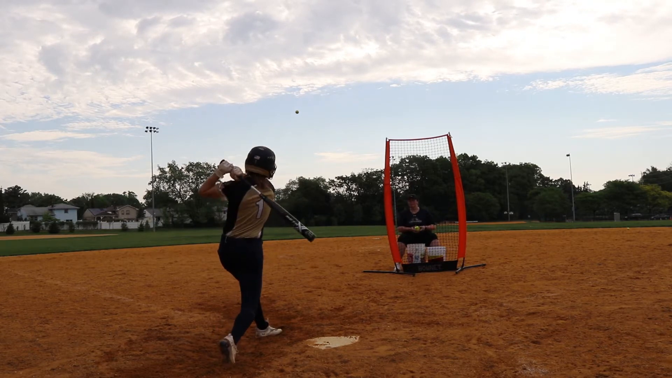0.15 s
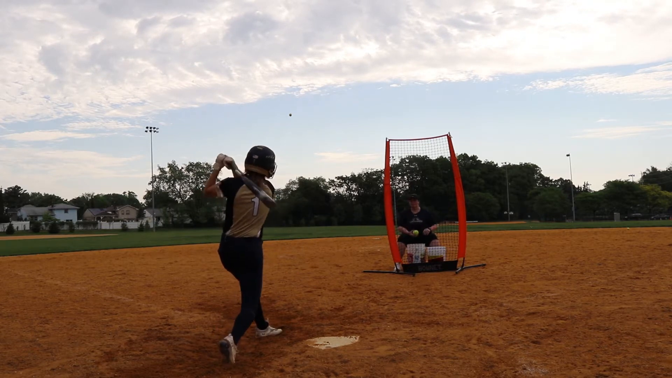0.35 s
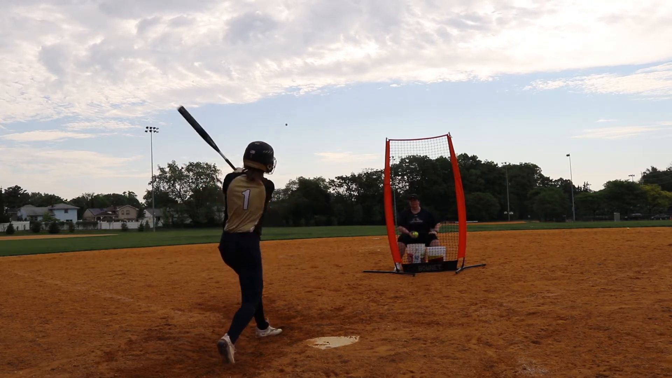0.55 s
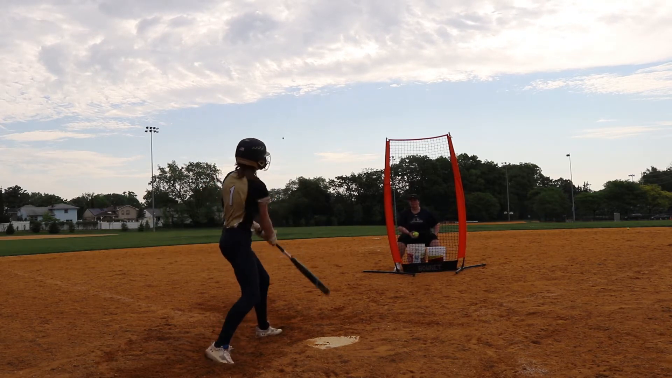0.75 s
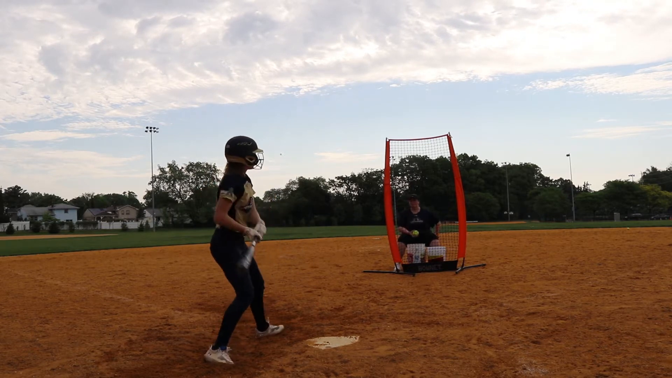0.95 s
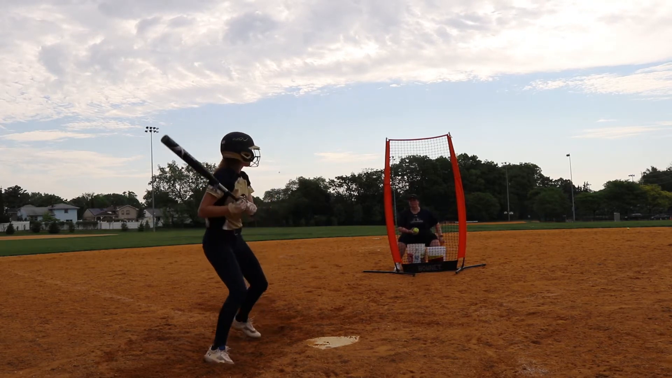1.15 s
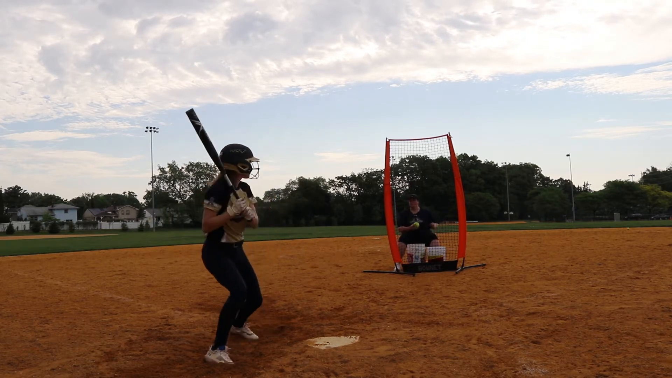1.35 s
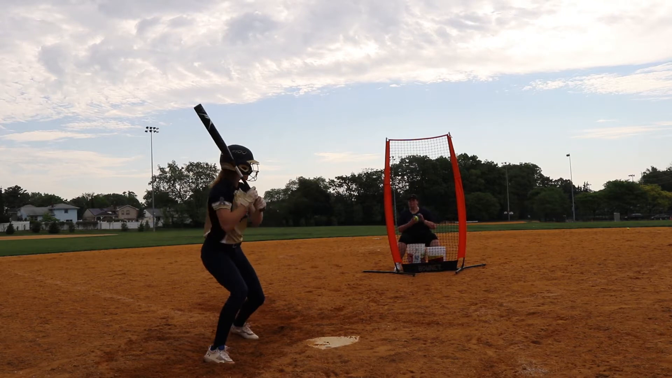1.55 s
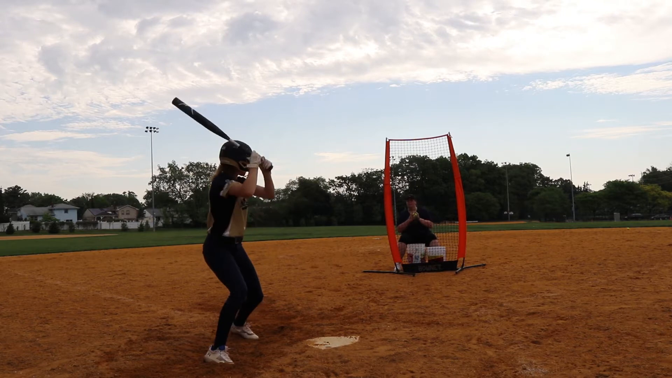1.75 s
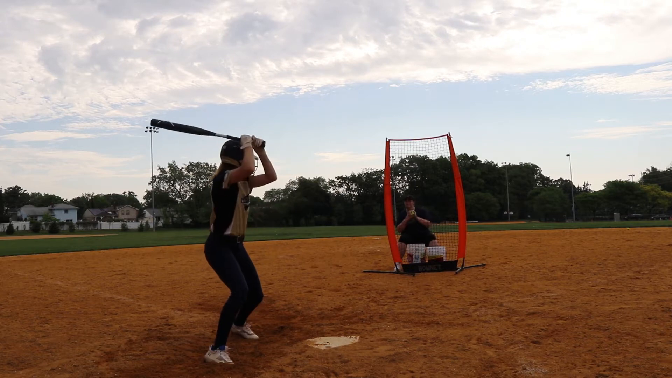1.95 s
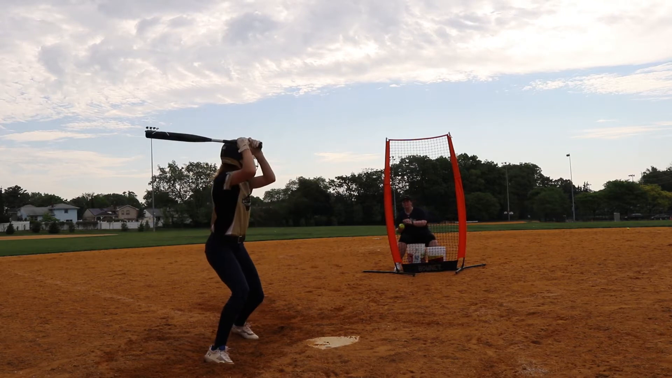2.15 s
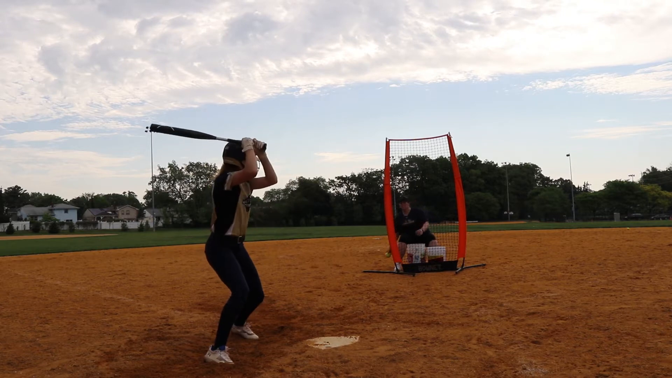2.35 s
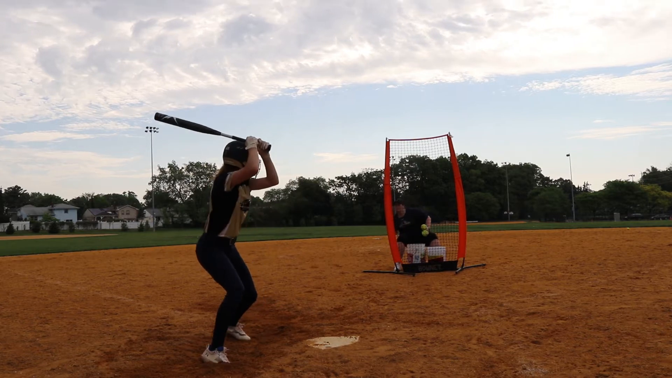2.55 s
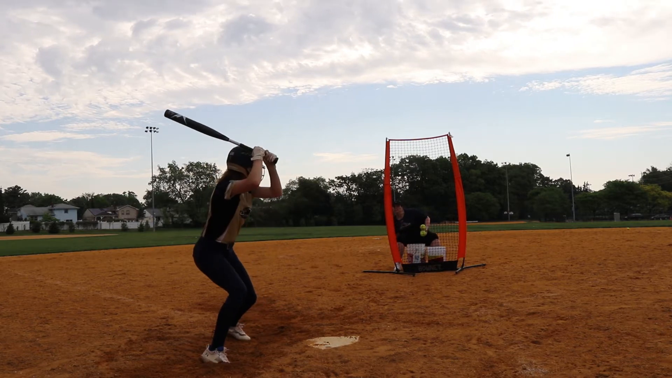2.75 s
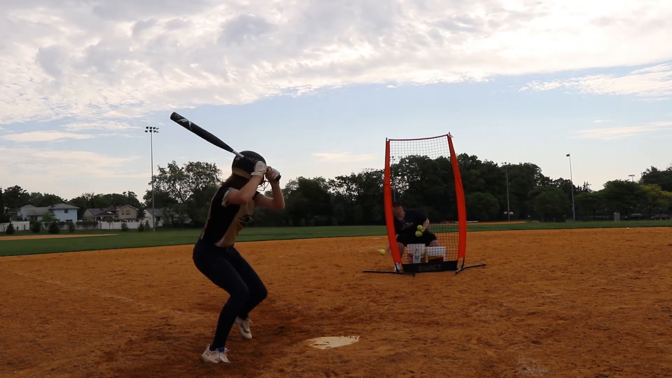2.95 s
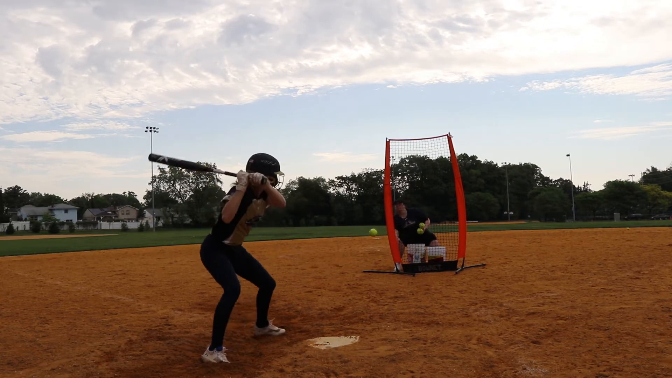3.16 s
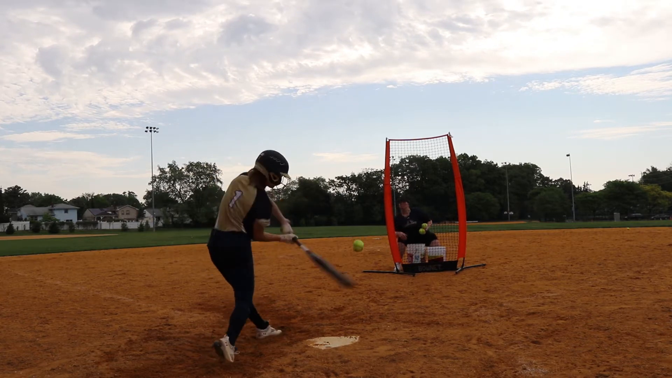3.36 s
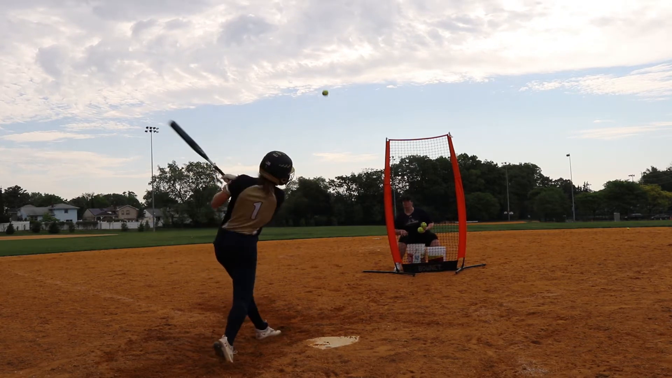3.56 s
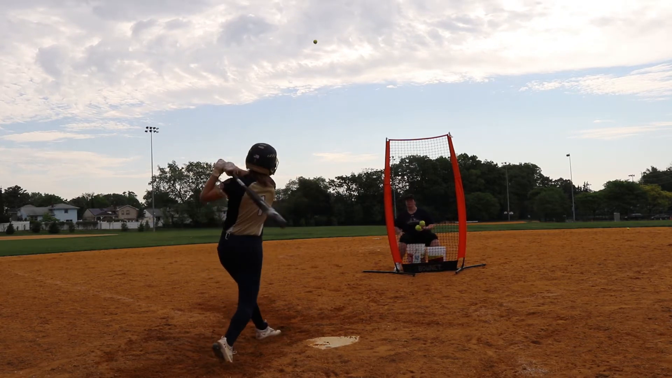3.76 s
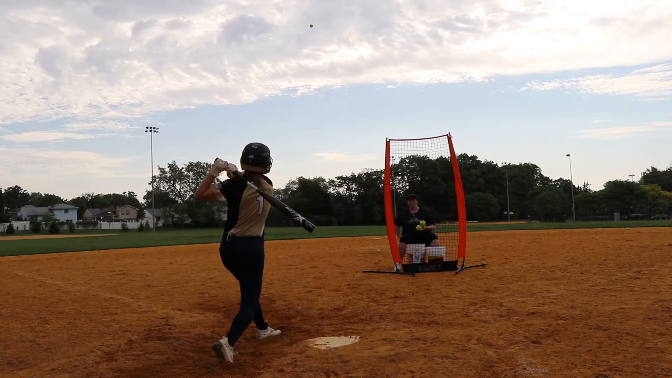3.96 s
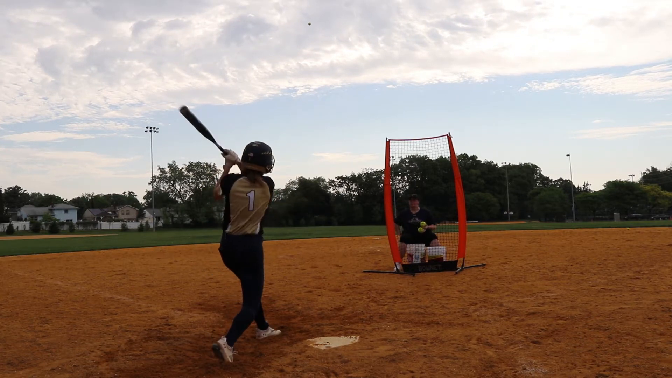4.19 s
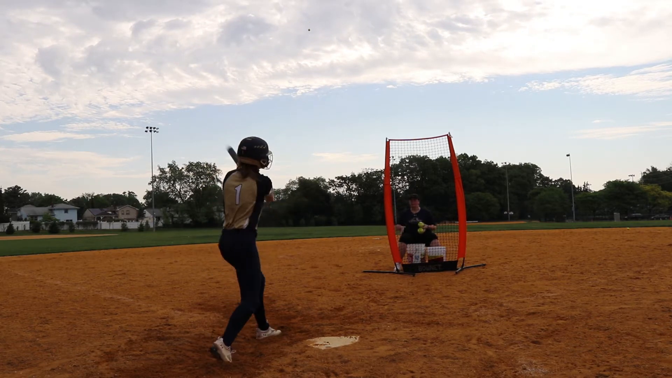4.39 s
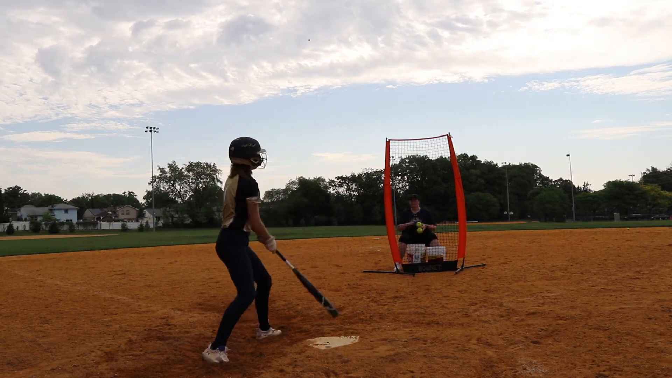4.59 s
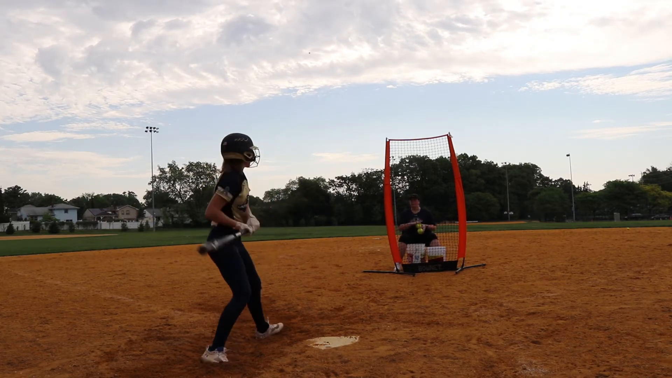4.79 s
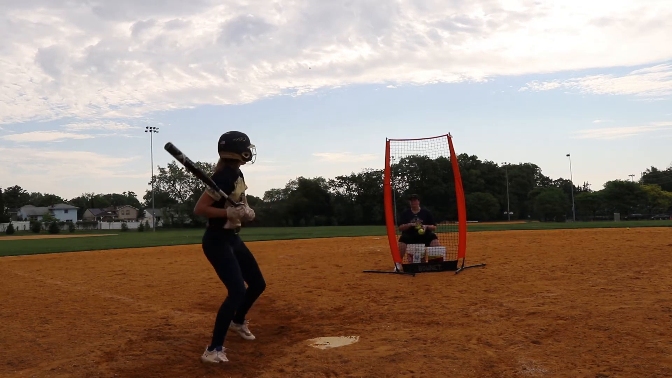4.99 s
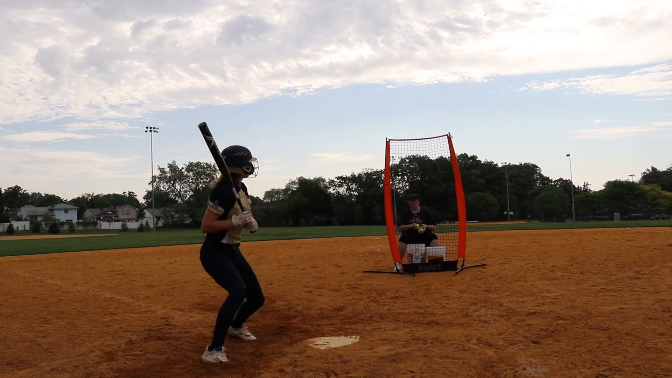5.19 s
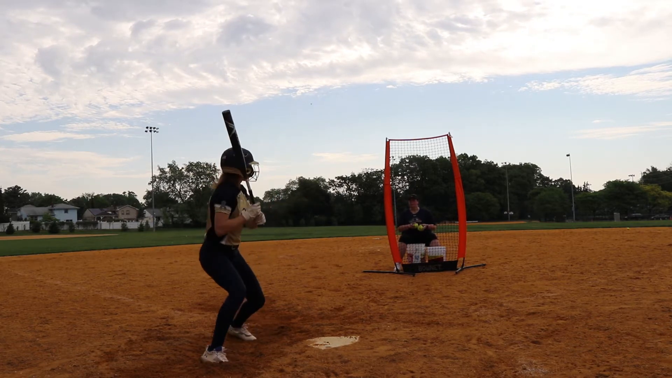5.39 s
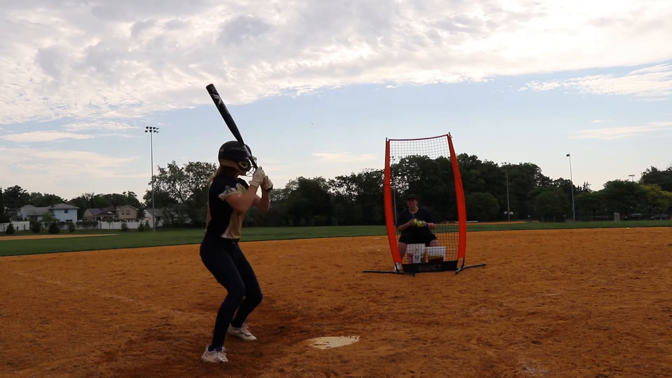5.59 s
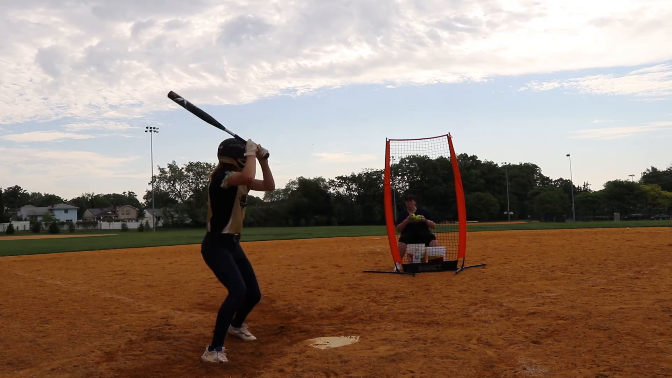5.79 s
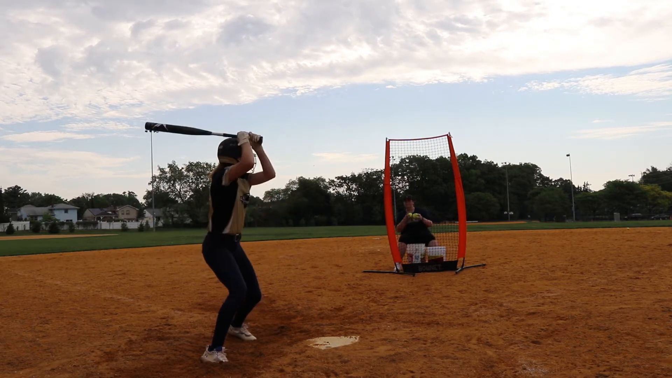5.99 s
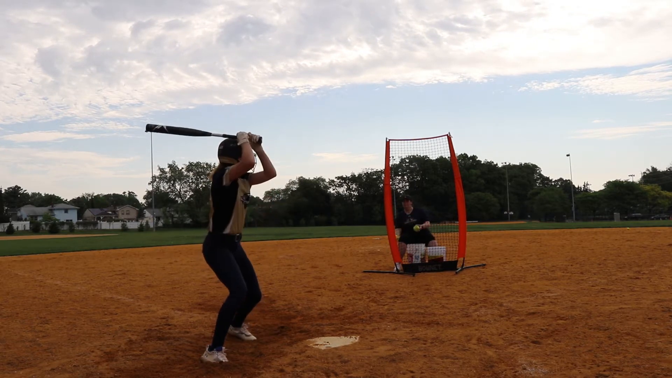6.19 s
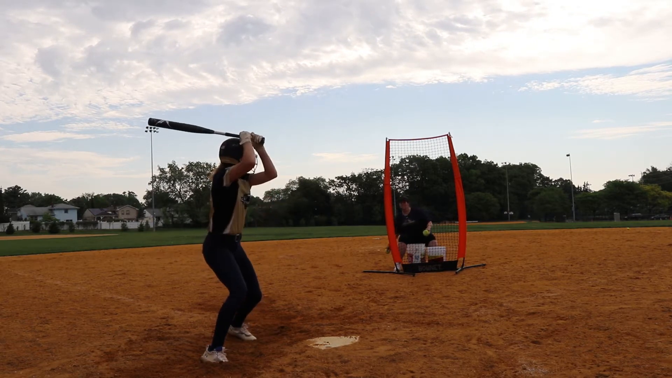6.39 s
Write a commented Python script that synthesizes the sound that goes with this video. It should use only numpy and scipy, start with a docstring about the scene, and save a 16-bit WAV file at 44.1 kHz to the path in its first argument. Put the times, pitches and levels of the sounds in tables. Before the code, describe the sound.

On an open dirt infield, a batter's shoes thud, click and scrape softly while small birds trill and whistle in far trees over faint rumble. Midway, a very short swish leads to one hard, bright bat crack that overloads the microphone and briefly ducks the background. Short echoes fade over the field, sparse scuffs and bird calls follow, and low breeze buffets the microphone near the end.

```python
"""A bat hits a tossed softball with one sharp crack: a push of air, ringing tones and scattered noise.
Around it the batter shuffles, strides and swings on a dirt infield: damped thuds, clicks and shaped noise.
Birds sing in the far trees as gliding tones, blurred by echoes, over a low outdoor rumble of noise.
A breeze, made of low lumpy noise, reaches the microphone near the end.
The crack overloads the microphone, whose gain control ducks and recovers."""
import sys
import numpy as np
from scipy import signal
from scipy.fft import rfft, irfft, next_fast_len
from scipy.io import wavfile
from scipy.ndimage import uniform_filter1d, map_coordinates

SR = 44100
rng = np.random.default_rng(int(sys.argv[2]) if len(sys.argv) > 2 else 0)


def persist_wave(psi):
    """Save psi, clipped to +-1, as 16-bit WAV."""
    counts = np.round(np.clip(psi, -1, 1) * 32767).astype(np.int16)
    wavfile.write(sys.argv[1], SR, np.atleast_2d(counts).T)


N = 283827  # length of the scene in samples
HIT_S = 3.4955  # the bat meets the ball

# soles twisting in the grit; hiss and weight are relative to the level:
# centre_s, half_length_s, level_db, hiss_db, weight_db
SOLE_TWISTS = [(0.11, 0.16, -71.5, -7, -13), (0.303, 0.035, -67, -29, 3.5), (0.543, 0.068, -67, -30, -13),
               (0.819, 0.041, -67.5, -10, 11.5), (0.93, 0.1, -73, -25, 3.5), (1.164, 0.0058, -71, 4.5, -20),
               (1.37, 0.02, -69.5, 2, 0), (2.244, 0.053, -64, -32, -2), (2.415, 0.028, -73, -18, 3.5),
               (3.291, 0.0097, -59, -2.5, -11), (3.323, 0.027, -56.5, -16.5, 1),
               (3.443, 0.043, -64, -4.5, -20.5), (3.678, 0.073, -61.5, -25, -24),
               (4.256, 0.028, -70, -9, -15), (4.59, 0.015, -70.5, -6, -10), (4.6, 0.087, -67, -20, -19),
               (4.733, 0.0038, -59.5, -4.5, 4), (4.797, 0.051, -63, -11.5, -18),
               (5.142, .013, -67.5, -10, 3), (5.19, 0.05, -72.5, 2, -1), (6.137, 0.02, -62.5, -18, -11),
               (6.37, 0.042, -72, -9, -1)]
# tone colour of loose dirt: frequency_hz, level_db
DIRT_COLOUR = [(150, -8.5), (500, 2.5), (1300, -0.5), (2400, -8), (4000, -18), (9000, -33), (15000, -40)]


def amp(db):
    """Turn decibels into a gain."""
    return 10 ** (np.asarray(db) / 20)


def unit(x):
    """Scale a sound to an average (rms) level of 1."""
    return x / np.sqrt(np.mean(x ** 2) + 1e-20)


def clock():
    """The time of every sample in seconds."""
    return np.arange(N) / SR


def curves(rows):
    """Join the points of each column after the time with straight lines, one value per sample."""
    times_s, *columns = np.transpose(rows)
    return [np.interp(clock(), times_s, column) for column in columns]


def wobble(rate, size=N):
    """A smooth random curve with the given number of random points a second."""
    points = rng.standard_normal(int(size * rate / SR) + 4)
    return map_coordinates(points, [np.arange(size) * rate / SR])


def bump(centre_s, half_s):
    """A smooth bell-shaped swell that reaches 1 at its centre."""
    return np.exp(-.5 * ((clock() - centre_s) / half_s) ** 2)


def noise(colour, size=N):
    """Steady noise of rms 1, louder or softer at each frequency as the colour table says."""
    colour_hz, colour_db = np.transpose(colour)
    fft_size = next_fast_len(size)
    hz = np.fft.rfftfreq(fft_size, 1 / SR)
    gain = amp(np.interp(np.log(hz + 1), np.log(colour_hz), colour_db))
    white = rng.standard_normal(fft_size)
    return unit(irfft(rfft(white) * gain, fft_size)[:size])


def patchy(colour, depth_db):
    """Noise whose colour shifts at random from moment to moment."""
    spectrogram = signal.stft(noise(colour, N + SR // 10), nperseg=512)[2]
    patches = rng.standard_normal(spectrogram.shape)
    patches = uniform_filter1d(patches, size=3, axis=0)  # blur over frequency
    patches = uniform_filter1d(patches, size=6, axis=1)  # blur over time
    shifted = signal.istft(spectrogram * amp(depth_db * unit(patches)), nperseg=512)[1]
    return unit(shifted[512:][:N])


def add(track, s, sound):
    """Mix a sound into the track at time s."""
    part = track[max(round(s * SR), 0):][:len(sound)]
    part += sound[:len(part)]


def knock(hz, t60, grit_db, rise_cycles=0.3, rough=0.43, slips_per_cycle=0.37):
    """A damped thud, unsteady as the dirt gives way, with a puff of grit; low ones start softer."""
    t = np.arange(SR // 10) / SR
    slip = rough * wobble(slips_per_cycle * hz, len(t))
    tone = np.sin(2 * np.pi * hz * t + slip - slip[0])
    puff = amp(grit_db) * noise(DIRT_COLOUR, len(t))
    rise = 1 - np.exp(-t * hz / rise_cycles)
    return amp(-60 * t / t60) * rise * (tone + puff)


def footwork():
    """Soles land with dull thuds; cleats click higher and grittier."""
    # shoes landing on packed dirt: start_s, level_db, pitch_hz, fade_by_60_db_s
    steps = [(.305, -33.5, 890, 0.0081), (.3107, -35, 607, 0.013), (.3157, -42, 674, 0.013),
             (.3183, -34, 780, 0.0071), (.532, -31, 660, 0.0094), (.577, -32, 744, 0.0056),
             (.7937, -25.5, 915, 0.018), (.818, -50, 702, .035), (.842, -46, 606.3, 0.029),
             (2.0709, -31.5, 274, 0.016), (2.195, -37.5, 740, 0.0059), (2.251, -43, 577, .016),
             (4.421, -45, 581, 0.024), (5.131, -44.5, 850, .018), (5.15, -47, 682, 0.017),
             (6.048, -48, 681, 0.028), (6.115, -47, 752, 0.035)]
    # cleats catching on small stones: start_s, level_db, pitch_hz
    clicks = [(.005, -51.5, 2533), (0.059, -53.5, 2580), (0.11, -59, 1470), (.126, -49.5, 1400),
              (.218, -50, 1370), (.252, -53.5, 2420), (.272, -41.5, 1370), (0.297, -48, 1300),
              (.468, -51.5, 1030), (.498, -59, 1824), (.568, -51, 2450), (.603, -50.5, 2240),
              (.637, -48.5, 2550), (0.7908, -43, 2430), (0.7923, -40.5, 1175), (2.237, -41.5, 1400),
              (2.3105, -51, 2150), (2.314, -47, 1760), (3.3135, -38, 1535), (3.641, -44, 2880),
              (3.687, -50, 2620), (4.588, -49.5, 1580), (4.604, -52.5, 1754), (4.728, -50.5, 1706),
              (4.802, -52, 1660), (4.822, -54, 1900), (6.33, -55, 1930), (6.377, -56, 1695)]
    out = np.zeros(N)
    for s, db, hz, t60 in steps:
        octaves = np.log2(hz / 700)  # above a usual landing
        grit_db = -22 + 3 * octaves  # deeper thuds are less gritty
        add(out, s, amp(db) * knock(hz, t60, grit_db))
    for s, db, hz in clicks:
        add(out, s, amp(db) * knock(hz, t60=0.017, grit_db=-9))
    return out


def scuffs(grain_db=4, catch_db=2.5):
    """Soles grind dirt and rub packed earth in uneven catches, while loose sand hisses smoothly above."""
    # packed earth under a weighted sole: frequency_hz, level_db
    packed_colour = [(120, -13.5), (400, 1), (900, -1), (1300, -7.5), (1900, -19.5), (2450, -9),
                     (3300, -24), (9000, -50.5)]
    # hissing loose sand: frequency_hz, level_db
    sand_colour = [(1000, -26), (3000, 4), (6000, 2), (9000, -1), (11000, -14.5), (15000, -14)]
    grind, hiss, press = np.zeros((3, N))
    for s, half_s, db, hiss_db, weight_db in SOLE_TWISTS:
        stroke = amp(db) * bump(s, half_s)
        grind += stroke
        hiss += stroke * amp(hiss_db)
        press += stroke * amp(weight_db)
    catches = unit(amp(grain_db * wobble(300) + catch_db * wobble(70)))
    rubbing = grind * patchy(DIRT_COLOUR, depth_db=3) + press * noise(packed_colour)
    return catches * rubbing + hiss * noise(sand_colour)


def grit(size_db=4, grains_per_s=110, grain_hz=1500, grain_t60=0.0055):
    """Single grains of sand snap under the soles as tiny fading tones of random pitch and size."""
    out, t = np.zeros(N), np.arange(SR // 40) / SR
    for s, half_s, db, *_ in SOLE_TWISTS:
        grains = rng.standard_normal((int(2 * half_s * grains_per_s), 3))
        for place, pitch, size in grains:
            hz = grain_hz * np.exp(.3 * pitch)
            snap = np.sin(2 * np.pi * hz * t) * amp(-60 * t / grain_t60)
            add(out, s + .7 * half_s * place, amp(db + size_db + 3.2 * size) * snap)
    return out


def patter(start_s=0, end_s=0.95, ticks_per_s=150, tick_hz=2220, tick_db=-62.5,
           spread_db=1.5, pitch_spread=0.263):
    """Loose crumbs tick at random moments, around one pitch, while the batter regains balance."""
    out = np.zeros(N)
    for s in rng.uniform(start_s, end_s, int(ticks_per_s * (end_s - start_s))):
        pitch, size = rng.standard_normal(2)
        tick = knock(tick_hz * np.exp(pitch_spread * pitch), t60=0.015, grit_db=-14)
        add(out, s, amp(tick_db + spread_db * size) * tick)
    return out


def outdoors(lumps_db=2.0, swell_db=3.5):
    """Distant rumble and faint far hiss are coloured noise; the breeze buffets the microphone in lumps."""
    # colours of the breeze on the microphone, the rumble, and the far trees and town:
    # frequency_hz, level_db
    buffet_colour = [(12, -7.5), (30, 0.5), (55, -0.5), (85, -6), (150, -8), (230, -16), (340, -28),
                     (600, -44.5), (3000, -120)]
    rumble_colour = [(40, -11.5), (90, 2.5), (160, 1), (240, -4.5), (350, -17.5), (600, -30), (4000, -120)]
    air_colour = [(180, -34), (300, -8), (667, -12.5), (814, -9), (1510, -14), (1970, -19), (3030, -20),
                  (3290, -22), (7570, -26.5), (8790, -30.5), (12900, -36.5), (16000, -51)]
    # loudness of the far trees and town: time_s, level_db
    air_level = [(0, -71.5), (1.2, -68.5), (1.7, -72), (3.2, -69.5), (3.8, -68), (4.8, -68), (5.6, -70),
                 (6.44, -69)]
    # light gusts on the microphone: peak_s, half_length_s, level_db
    gusts = [(1.03, 0.31, -60), (5.093, 0.26, -53.5)]
    calm_db, town_db = -70.5, -62.5  # the air between gusts; distant rumble
    breeze_s, breeze_rise_s, breeze_db = 5.52, 0.05, -45.5  # a steady breeze sets in

    set_in = .5 + .5 * np.tanh((clock() - breeze_s) / breeze_rise_s)
    gusting = sum(amp(db) * bump(s, half_s) for s, half_s, db in gusts)
    breeze = amp(calm_db) + amp(breeze_db) * set_in + gusting
    buffet = breeze * unit(amp(lumps_db * wobble(18)) * noise(buffet_colour))
    rumble = amp(town_db + swell_db * wobble(19)) * noise(rumble_colour)
    air_db, = curves(air_level)
    air = amp(air_db + 0.87 * wobble(10.0)) * patchy(air_colour, depth_db=3)
    return buffet + rumble + air


def whistle(length_s, start_hz, middle_hz, end_hz, rough):
    """One bird note on a curved glide; a rough one flutters in pitch and level."""
    progress = np.linspace(0, 1, max(int(length_s * SR), 8))
    glide = np.polyfit([0, .5, 1], [start_hz, middle_hz, end_hz], 2)
    hz = np.polyval(glide, progress)
    hz = hz + rough * 330 * wobble(500, len(progress))
    swell = np.sqrt(np.abs(np.sin(np.pi * progress)))
    swell = swell * amp(rough * 5 * wobble(90, len(progress)))
    return unit(swell * np.sin(2 * np.pi * np.cumsum(hz) / SR))


def trill(period_s=0.076, pair_s=0.024, jitter_s=0.0022, spread_db=0.5, pitch_spread=0.01):
    """A high, slightly uneven run of paired upsweeps, the second of each pair lower."""
    # when the run is heard: start_s, end_s
    trill_span = (0.02, 2.46)
    # how loud it is: time_s, level_db
    trill_level = [(0, -80.5), (.8, -79), (1.5, -78), (1.9, -84), (2.4, -71)]
    # its two upsweeps: start_hz, middle_hz, end_hz
    upsweeps = [(5450, 5900, 6900), (5220, 5680, 6048.7)]
    out = np.zeros(N)
    for s in np.arange(*trill_span, period_s):
        level_db = np.interp(s, *np.transpose(trill_level))
        for k, sweep_hz in enumerate(upsweeps):
            late, size, pitch = rng.standard_normal(3)
            note_hz = np.multiply(sweep_hz, 1 + pitch_spread * pitch)
            note = whistle(0.013, *note_hz, rough=0.27)
            add(out, s + k * pair_s + jitter_s * late, amp(level_db + spread_db * size) * note)
    return out


def buzzes(pulse_db=8, pulses_per_s=55):
    """Hoarse slurs from farther birds fall evenly in pitch and pulse in loudness as they go."""
    # one slur per row, roughness about 0-1: start_s, length_s, from_hz, to_hz, level_db, roughness
    slurs = [(.037, 0.115, 7650, 6900, -79.5, 1), (1.512, 0.089, 8400, 6800, -77.5, .9),
             (1.305, 0.037, 3310, 3150, -69, 0.7), (1.742, 0.08, 2900, 2630, -76, 1.05),
             (2.165, .05, 4500, 3600, -84, 0.9), (2.345, .055, 4720, 3900, -80, 1),
             (2.556, 0.097, 3290, 3030, -76, 0.9), (2.73, 0.031, 2680, 2330, -65, 1.14),
             (2.912, 0.039, 4700, 3700, -82, .9), (2.943, .1, 3520, 3320, -78, .7),
             (4.831, 0.12, 4200, 3829, -72.5, 0.88), (4.926, .13, 3600, 3165, -77, .5),
             (5.149, 0.098, 4496, 4104, -68, .4), (5.447, .1, 5190, 3900, -80, 1)]
    out = np.zeros(N)
    for s, length_s, from_hz, to_hz, db, rough in slurs:
        slur = whistle(length_s, from_hz, (from_hz + to_hz) / 2, to_hz, rough)
        add(out, s, amp(db) * slur)
    pulses = amp(pulse_db * np.sin(2 * np.pi * pulses_per_s * clock()))
    return out * unit(pulses)


def far_whistles():
    """Thin, distant whistles glide evenly in pitch."""
    # one whistle per row: start_s, length_s, from_hz, to_hz, level_db
    thin_notes = [(0.374, 0.11, 4330, 4250, -80), (0.9, 0.26, 2580, 3250, -74),
                  (1.2, 0.08, 3030, 3460, -77.5), (1.264, 0.084, 3290, 3010, -72.5),
                  (1.65, 0.053, 2180, 1990, -76.5), (1.869, 0.083, 2370, 2430, -78.5)]
    out = np.zeros(N)
    for s, length_s, from_hz, to_hz, db in thin_notes:
        note = whistle(length_s, from_hz, (from_hz + to_hz) / 2, to_hz, rough=0.144)
        add(out, s, amp(db) * note)
    return out


def caller(syllable_s=.036):
    """One bird repeats a falling sweep, a little higher or lower each time, then a short arch."""
    # one call per row, arch delay counted from the sweep's start:
    # start_s, from_hz, to_hz, sweep_level_db, arch_delay_s, arch_level_db
    calls = [(0.485, 4500, 3850, -70.5, 0.052, -70.5), (3.681, 4900, 4030, -63, 0.05, -61),
             (4.506, 4950, 4160, -73, 0.056, -70), (5.226, 4700, 3996, -72, .056, -69),
             (6.068, 4300, 3430, -76, 0.04, -65)]
    # pitch of the arch: start_hz, middle_hz, end_hz
    arch_hz = (3013, 3410, 3050)
    out = np.zeros(N)
    for s, from_hz, to_hz, sweep_db, delay_s, arch_db in calls:
        sweep = whistle(syllable_s, from_hz, (from_hz + to_hz) / 2, to_hz, rough=.5)
        add(out, s, amp(sweep_db) * sweep)
        arch = whistle(syllable_s, *arch_hz, rough=0.17)
        add(out, s + delay_s, amp(arch_db) * arch)
    return out


def songbird():
    """A songbird's phrase is a row of almost clean whistles on curved glides."""
    # one whistle per row: start_s, length_s, start_hz, middle_hz, end_hz, level_db
    song = [(1.737, 0.06, 2100, 2500, 2610, -68), (1.773, 0.09864, 2700, 2405, 2270, -74),
            (2.146, 0.015, 3400, 3080, 2700, -66), (2.204, 0.078, 3150, 2903, 2890, -60),
            (2.366, 0.069, 2500, 2390, 2160, -69.5), (2.391, .022, 2450, 2900, 3440, -65.5),
            (2.423, 0.01944, 3650, 3400, 3000, -67), (2.491, 0.0082, 2600, 2480, 2330, -64.5),
            (2.571, .11, 2660, 2827, 2754, -59), (2.683, 0.037, 3050, 3130, 2950, -75.5),
            (2.736, 0.03, 2100, 2040, 2060, -67.5), (2.909, .07, 2750, 3220, 3500, -71.5),
            (2.964, 0.08779, 3300, 2596, 2490, -62), (3.063, 0.03203, 3140, 2950, 2660, -71),
            (3.092, 0.036, 2550, 2880, 2960, -62.5), (3.122, .058, 3002, 2556, 2450, -63.5),
            (3.054, 0.059, 5560, 5250, 4900, -78), (3.192, .022, 5550, 5200, 4900, -71),
            (3.209, 0.023, 5000, 5140, 4600, -66)]
    out = np.zeros(N)
    for s, length_s, start_hz, middle_hz, end_hz, db in song:
        add(out, s, amp(db) * whistle(length_s, start_hz, middle_hz, end_hz, rough=0.12))
    return out


def through_trees(call, wet_db, t60, trunks=12, latest_s=0.069, trunk_db=-21):
    """A call arrives directly, off a few trunks and as a smear from the leaves, balanced in energy."""
    t = np.arange(SR // 2) / SR
    smear = rng.standard_normal(len(t)) * amp(-60 * t / t60)
    paths = amp(wet_db) * smear / np.linalg.norm(smear)
    paths[0] += 1  # the direct path
    for delay_s in rng.uniform(0, latest_s, trunks):
        add(paths, delay_s, amp([trunk_db]))
    return signal.fftconvolve(call, paths / np.linalg.norm(paths))[:N]


def birds(flutter_db=2.5):
    """All the birds flutter in the moving air; the trees smear the farther ones more."""
    near = through_trees(caller(), wet_db=-11, t60=.3)
    middle = through_trees(songbird() + trill(), wet_db=-7.0, t60=0.45)
    hoarse = through_trees(buzzes(), wet_db=-2.5, t60=.35)
    far = through_trees(far_whistles(), wet_db=1, t60=0.73)
    return (near + middle + hoarse + far) * amp(flutter_db * wobble(35))


def swing(contact_db=-44, rise_s=0.034):
    """The bat's swish is noise that grows ever faster up to the contact, then stops."""
    lead_s = HIT_S - clock()
    growth = np.exp(-np.abs(lead_s) / rise_s)
    return (lead_s > 0) * amp(contact_db) * growth * noise(DIRT_COLOUR)


def crack(snap_db=-28, snap_t60=0.023, push_db=-19.0, push_s=0.001,
          scatter_db=-35, scatter_t60=0.14, treble_t60=0.16,
          thud_db=-35, thud_t60=0.06, field_db=-54, field_t60=1.0):
    """The ball squashes on the barrel with a push of air; tones swell in contact and quickly die."""
    # ringing tones of the bat barrel and the ball: pitch_hz, level_db, fade_by_60_db_s, rise_s
    bat_tones = [(895, 6.4, .0113, .0022), (1205, -6.6, .0034, .0001), (1379, 21.7, .0109, .0028),
                 (1440, -20.5, .1, .00035), (1537, 0, .0155, .0007), (2195, -11, .042, .0001),
                 (2345, -8.9, .0266, .0007), (2570, -10.4, .0224, .0011), (3247, 2.5, .0044, .00046),
                 (3740, -21, .028, .0002), (4367, -18.5, .022, .0003), (4819, -28, .05, .0003),
                 (5239, -28.7, .039, .0007), (5986, -16.4, .0088, .0004), (7530, -10, .016, .0009),
                 (8172, -3.5, .0095, .0004), (8800, -3.6, .008, .00022), (10639, -14.3, .0067, .00015),
                 (13736, -14, .006, .0002)]
    # answers of the ground, the net and the far edge of the field: delay_s, level_db
    echoes = [(0.0125, -38), (.027, -37), (.038, -39), (.313, -50), (.426, -50)]
    # colours of the short scatter from the infield, the dull answer of the dirt and the batter's
    # body, and the long scatter from fences and trees: frequency_hz, level_db
    infield_colour = [(200, -21), (700, -7), (1400, 1), (3000, -8.5), (5000, -5.5), (9000, -12.5),
                      (15000, -35)]
    thud_colour = [(120, -24), (300, -9.5), (520, 1.5), (750, -2), (1120, 1.5), (1350, -14), (2000, -34.5),
                   (6000, -71)]
    field_colour = [(500, -16), (1100, -8), (1400, 4.5), (1800, -5.5), (2700, -2), (4000, -7), (4900, 0),
                    (5700, -6.5), (7000, -4.5), (9000, -12), (15000, -27)]

    out, t = np.zeros(N), np.arange(SR) / SR
    ring = np.zeros(len(t))
    for hz, db, t60, rise_s in bat_tones:
        swell = (1 - np.exp(-t / rise_s)) ** 2
        ring += amp(db - 60 * t / t60) * swell * np.sin(2 * np.pi * hz * t)
    snap = amp(snap_db - 60 * t / snap_t60) * rng.standard_normal(len(t))
    push = amp(push_db) * np.exp(-t / push_s)
    direct = snap - push - ring

    scatter = amp(scatter_db) * noise(infield_colour, len(t))
    lowpass = signal.butter(2, 1900, fs=SR, output="sos")
    body = signal.sosfiltfilt(lowpass, scatter)
    treble = scatter - body
    near = body * amp(-60 * t / scatter_t60) + treble * amp(-60 * t / treble_t60)
    thud = amp(thud_db - 60 * t / thud_t60) * noise(thud_colour, len(t))
    far = amp(field_db - 60 * t / field_t60) * noise(field_colour, len(t))
    add(out, HIT_S, direct + near + thud + far)

    # soft ground and leaves swallow the treble of the echoes
    muffled = signal.lfilter(*signal.butter(1, 2500, fs=SR), direct)
    for delay_s, db in echoes:
        add(out, HIT_S + delay_s, amp(db) * muffled)
    return out


def afterring(waver=1.2, waver_db=4.0):
    """A few thin tones outlast the crack, wavering in phase (radians) and level."""
    # tones that hang over the field: pitch_hz, level_db, fade_by_60_db_s
    lingering = [(1422.4, -64, 1.1), (1333.3, -64, 1.3), (4830, -68, 1.0), (5020, -73, 2.4)]
    out, t = np.zeros(N), np.arange(SR) / SR
    for hz, db, t60 in lingering:
        level = amp(db - 60 * t / t60 + waver_db * wobble(30, len(t)))
        phase = 2 * np.pi * hz * t + waver * wobble(45, len(t))
        add(out, HIT_S, level * np.sin(phase))
    return out


def scene():
    """Everything that reaches the microphone, as one channel."""
    ground = footwork() + scuffs() + grit() + patter()
    hit = swing() + crack() + afterring()
    return (ground + outdoors() + birds() + hit)[None]


def gain_control(x, threshold_db=-18, release_db_per_s=70, attack_s=.02):
    """Peaks over the threshold pull the gain down; it then climbs back steadily."""
    over_db = np.maximum(20 * np.log10(np.abs(x) + 1e-9) - threshold_db, 0)
    ramp_db = release_db_per_s * clock()
    # hold each peak, letting it sink at the release speed
    held_db = np.maximum.accumulate(over_db + ramp_db, axis=-1) - ramp_db
    keep = np.exp(-1 / (attack_s * SR))
    cut_db = signal.lfilter([1 - keep], [1, -keep], held_db)
    return x * amp(-cut_db)


def record(dry):
    """The microphone adds gain control, soft overload and a treble limit; the sound also cuts out twice
    briefly."""
    # the sound cuts out: from_s, to_s
    gaps = [(2.471, 2.491), (2.511, 2.53)]
    x = gain_control(dry)
    x = x / (1 + np.abs(x / .8) ** 4) ** (1 / 4)  # soft overload
    for start_s, end_s in gaps:
        is_open = 1.0 * ((clock() < start_s) | (clock() > end_s))
        x = x * uniform_filter1d(is_open, size=64)  # softened edges
    treble_limit = signal.butter(20, 15400, fs=SR, output="sos")  # lowpass, Hz
    return signal.sosfilt(treble_limit, x)


dry = scene()
out = record(dry)
persist_wave(out)
```